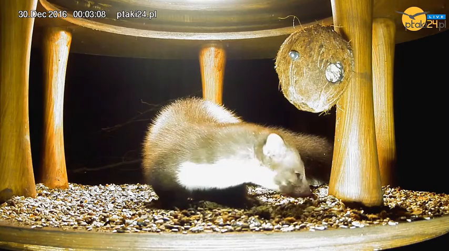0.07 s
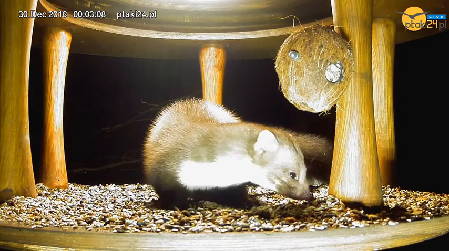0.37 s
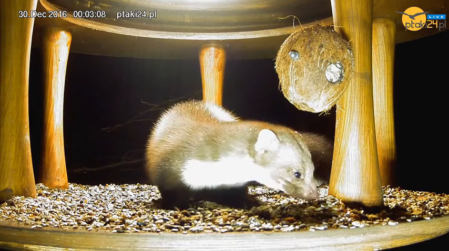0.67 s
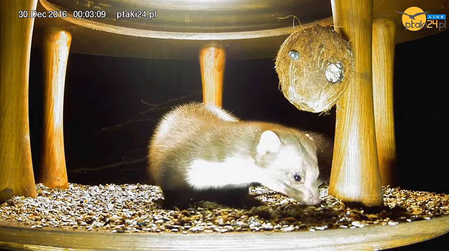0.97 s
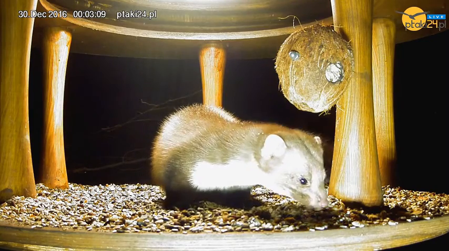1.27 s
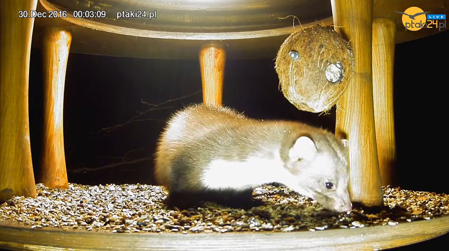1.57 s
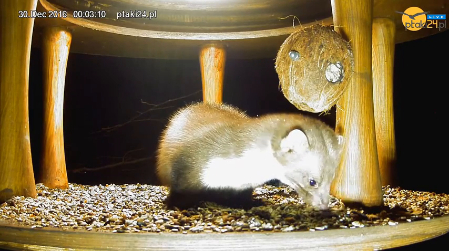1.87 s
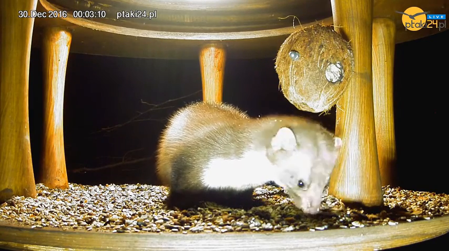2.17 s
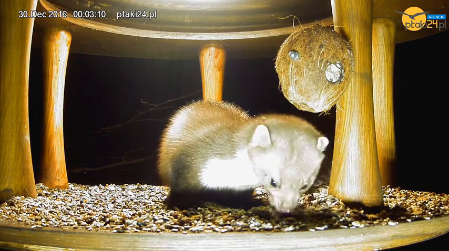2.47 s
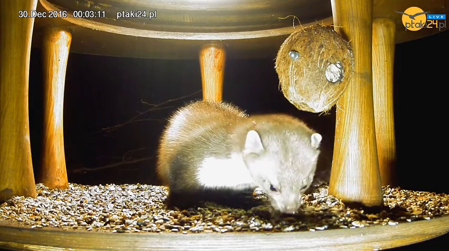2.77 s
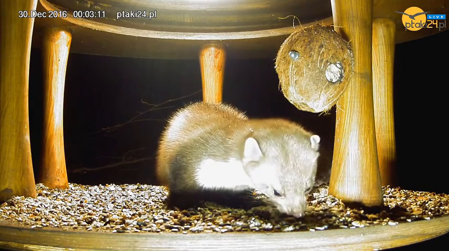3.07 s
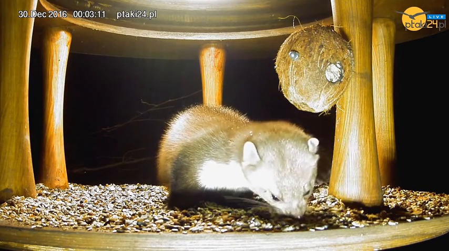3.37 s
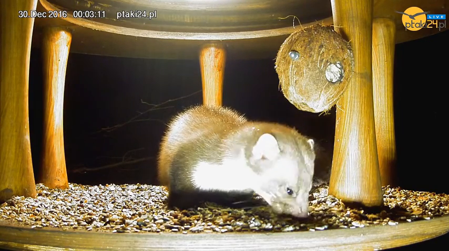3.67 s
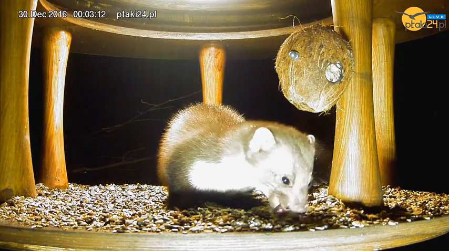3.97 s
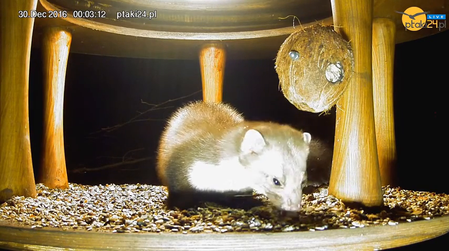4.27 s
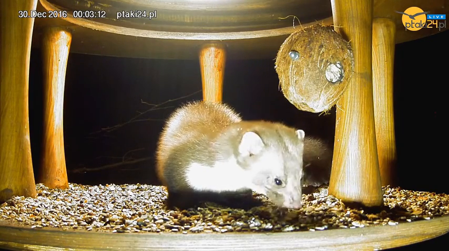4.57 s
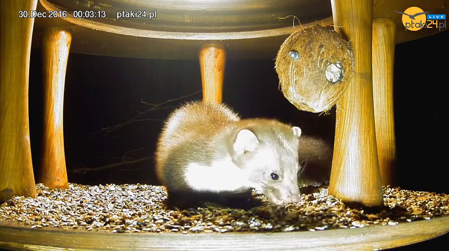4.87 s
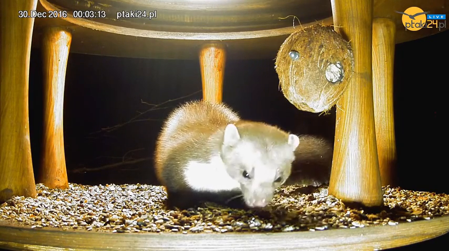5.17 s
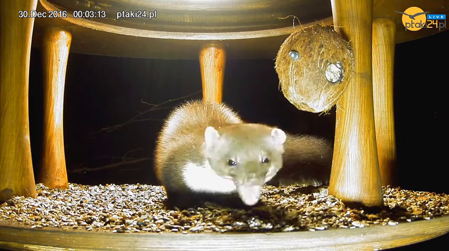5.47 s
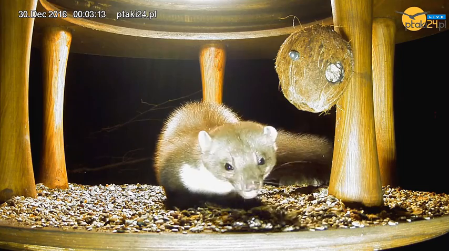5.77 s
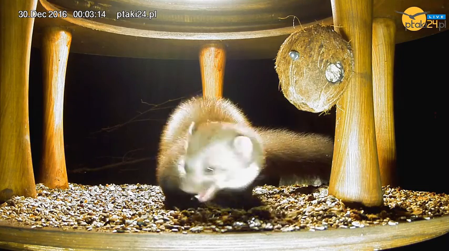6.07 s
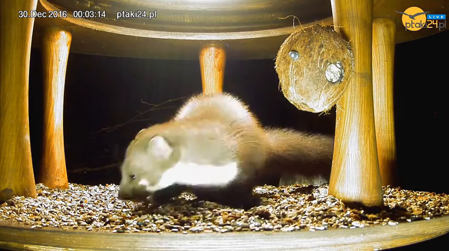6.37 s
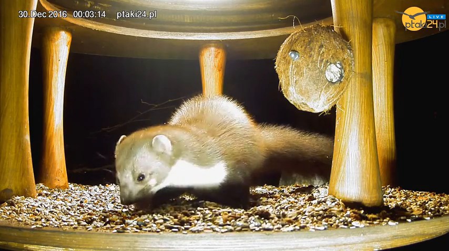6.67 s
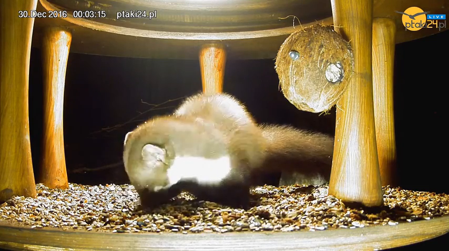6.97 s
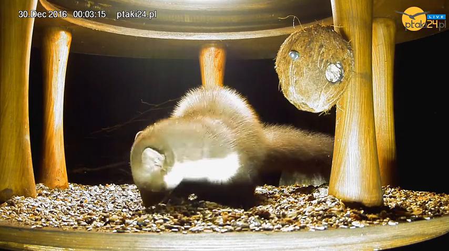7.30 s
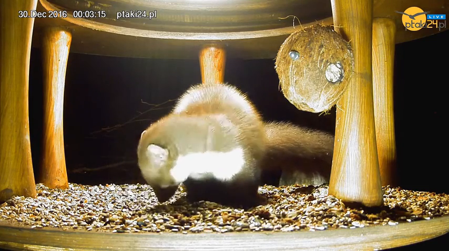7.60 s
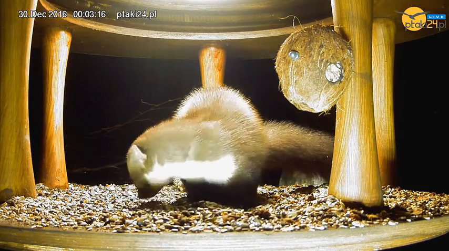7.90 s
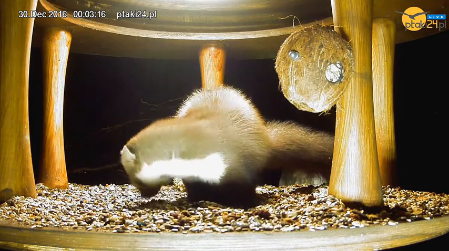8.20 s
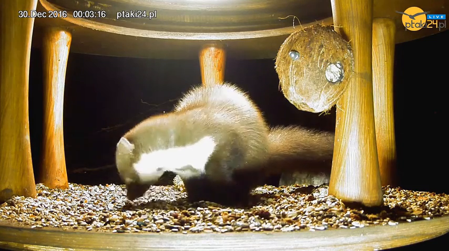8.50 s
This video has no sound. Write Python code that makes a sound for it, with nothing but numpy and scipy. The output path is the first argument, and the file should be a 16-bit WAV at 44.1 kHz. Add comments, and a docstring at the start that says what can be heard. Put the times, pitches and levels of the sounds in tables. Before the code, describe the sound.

Steady electrical hum and hiss, with quiet, scattered ticks and snaps of a marten chewing seeds, then two soft taps.

```python
"""Mains hum and hiss from a webcam microphone, at telephone bandwidth. Under them, at night, a marten
shifts loose seeds in a roofed wooden bird feeder. From about 3 s it eats: muzzle and paws stir the
seeds, husks tick, snap and splinter between its teeth. Twice something taps the tray softly.
Tray, posts and roof add short reflections."""
import sys
import numpy as np
from scipy import signal
from scipy.fft import rfft, irfft, next_fast_len
from scipy.io import wavfile

SR = 44100
rng = np.random.default_rng(int(sys.argv[2]) if len(sys.argv) > 2 else 0)


def store_pcm(level_fs):
    """Save levels as 16-bit WAV."""
    pcm = np.round(np.clip(level_fs, -1, 1) * 32767).astype(np.int16)
    wavfile.write(sys.argv[1], SR, np.atleast_2d(pcm).T)


N = 381024
FRAGMENT_BODY_DB = -5  # body share of ticks and splinters


def amp(db):
    """Decibels to gain."""
    return 10 ** (np.asarray(db) / 20)


def unit(x):
    """Scale to rms 1."""
    return x / np.sqrt(np.mean(x ** 2) + 1e-20)


def filtered(x, response):
    """Apply the gain response(hz) to the spectrum of x."""
    size = next_fast_len(N + SR // 2)
    return irfft(rfft(x, size) * response(np.fft.rfftfreq(size, 1 / SR)), size)[:N]


def coloured(x, points):
    """Shape x by (Hz, dB) points on a log axis."""
    points_hz, db = np.transpose(points)
    return filtered(x, lambda hz: amp(np.interp(np.log(hz + 1), np.log(points_hz + 1), db)))


def add(track, start_s, sound):
    """Mix a short sound into track."""
    part = track[round(start_s * SR):][:len(sound)]
    part += sound[:len(part)]


def ring(t, hz, t60_s):
    """One damped mode."""
    return np.sin(2 * np.pi * hz * t) * amp(-60 * t / t60_s)


def grains(per_s, spread_db=1.0):
    """Random impulses of uneven size, rms 1."""
    impulses = (rng.random(N) < per_s / SR) * rng.choice([-1, 1], N)
    return unit(impulses * amp(spread_db * rng.standard_normal(N)))


def electronics(mains_hz=50.1, whine_hz=885.9, whine_db=-77.5):
    """Steady hiss, rectified mains hum (even multiples strongest) and one thin whine."""
    # Microphone noise. Each row: frequency in Hz, density in dB per Hz.
    hiss_spectrum = [(5, -90), (14, -77.5), (35, -78), (60, -82), (120, -84), (250, -88), (500, -89.5),
                     (700, -90.5), (950, -94.5), (1300, -95.5), (1700, -96.5), (2600, -96), (3200, -97),
                     (3900, -105)]
    # Hum partials. Each row: multiple of the mains, rms level in dB.
    harmonics = [(1, -65.5), (2, -49.5), (3, -77), (4, -65.5), (5, -79), (6, -64.5), (7, -85.5), (8, -68.5),
                 (10, -73.5), (12, -76.5), (14, -87), (16, -70.5), (18, -76), (20, -79.5), (22, -78),
                 (24, -82), (26, -82), (28, -86.5), (30, -85.5), (42, -87), (44, -90), (52, -86.5)]
    t = np.arange(N) / SR

    def tone(hz, rms_db):
        return np.sqrt(2) * amp(rms_db) * np.sin(2 * np.pi * (hz * t + rng.random()))

    hiss = coloured(rng.standard_normal(N), hiss_spectrum) * np.sqrt(SR / 2)
    hum = sum(tone(multiple * mains_hz, db) for multiple, db in harmonics)
    return hiss + hum + tone(whine_hz, whine_db)


def seed_rustle(idle_db=-79):
    """Seeds rub in short swells of dense grains; in between, single ones shift under the paws."""
    # Seeds pushed about or ground. Each row: centre in seconds, half length in seconds, level in dB.
    stirs = [(3.105, 0.18, -63.5), (3.71, 0.015, -61.5), (3.945, 0.041, -69), (4.14, .03, -65.5),
             (5.162, 0.033, -74), (5.82, 0.019, -65), (6.12, 0.037, -65), (6.406, 0.015, -64.5),
             (8.568, 0.054, -67.5)]
    # Colour of loose seeds. Each row: frequency in Hz, relative level in dB.
    seed_spectrum = [(300, -26), (900, -3.5), (1350, 7), (1800, -7), (2400, 0), (3100, 1.5), (3800, -2),
                     (4600, -40)]
    t = np.arange(N) / SR
    swells = sum(amp(db) * np.exp(-((t - centre_s) / half_s) ** 2) for centre_s, half_s, db in stirs)
    stirred = unit(coloured(grains(per_s=3300), seed_spectrum))
    settling = unit(coloured(grains(per_s=33), seed_spectrum))
    return swells * stirred + amp(idle_db) * settling


def fracture(husk_hz, body_db, husk_t60_s=0.004, halving_db=11.5, scatter_db=5.5):
    """A breaking husk rings and shakes shared body modes; the more it passes on, the shorter it rings."""
    # Body modes of every snap. Each row: frequency in Hz, relative level in dB, t60 in seconds.
    modes = [(700, -12.5, 0.0083), (1395, -13, 0.02), (2410, -18.5, 0.016), (3100, -17.5, 0.015)]
    t = np.arange(SR // 20) / SR
    body = sum(amp(db + scatter_db * rng.standard_normal()) * ring(t, hz, t60_s)
               for hz, db, t60_s in modes)
    husk = ring(t, husk_hz, husk_t60_s * 2 ** (-body_db / halving_db))
    return husk + amp(body_db) * body


def chewing(gap_s=0.41, tick_db=-53, tick_hz=3050, scatter_db=3.0, pitch_scatter=0.08):
    """Bits of husk tick faintly between the teeth, a few times a second."""
    # Spells of chewing. Each row: start in seconds, end in seconds.
    spells = [(2.9, 6.15), (8.05, 8.6)]
    out = np.zeros(N)
    for start_s, end_s in spells:
        for beat_s in np.arange(start_s, end_s, gap_s):
            size, pitch = rng.standard_normal(2)
            tick = fracture(tick_hz * np.exp(pitch_scatter * pitch), FRAGMENT_BODY_DB)
            late_s = 0.5 * gap_s * rng.random()
            add(out, beat_s + late_s, amp(tick_db + scatter_db * size) * tick)
    return out


def bites(gap_s=0.0037, splinter_db=-11.5, rise_db=0.5, scatter_db=1.0, pitch_scatter=0.087):
    """Husks crack; some then crumble in a quick, uneven run of weaker splinters."""
    # Cracking husks. Each row: start in seconds, level in dB, husk pitch in Hz, body share in dB,
    # crumbling time in seconds.
    cracks = [(3.289, -44.5, 3000, -3, 0.0018), (3.698, -35.5, 2400, 7, 0.03), (3.7138, -42, 2100, 2.5, 0),
              (3.779, -48.5, 3230, 1.5, 0.026), (3.9117, -34, 2810, 0, 0), (3.9569, -45, 2330, -8, 0.0077),
              (4.3854, -41, 2950, -11, 0), (4.505, -45.5, 1950, -17, 0.0032),
              (4.9087, -40, 2300, 1, 0.0018), (5.0132, -44.5, 2300, -7, 0), (5.152, -38, 2170, -2.5, 0.005),
              (5.2166, -34, 2610, -2, 0.005), (5.221, -33, 2380, -5, 0),
              (5.4514, -35.5, 3040, -12.5, 0.004), (5.4623, -47, 3000, -8, 0),
              (5.798, -35.5, 2990, 3, 0.02), (6.406, -40, 2700, 5, 0.012), (6.431, -44.5, 2390, -5, 0),
              (8.209, -48, 2670, -4, 0), (8.5518, -49.5, 2600, 3, 0)]
    out = np.zeros(N)
    for start_s, crack_db, husk_hz, body_db, crumble_s in cracks:
        add(out, start_s, amp(crack_db) * fracture(husk_hz, body_db))
        for k in range(8):  # at most 8 splinters
            late_s = gap_s * (k + 0.5 + rng.random())
            size, pitch = rng.standard_normal(2)
            splinter = fracture(husk_hz * np.exp(pitch_scatter * pitch), FRAGMENT_BODY_DB)
            if late_s < crumble_s:
                level_db = crack_db + splinter_db + rise_db * late_s / crumble_s + scatter_db * size
                add(out, start_s + late_s, amp(level_db) * splinter)
    return out


def husks(gain_db=2.5, low_cut_hz=950):
    """Bites and chewing together, with the bass below about 1 kHz kept low."""
    low_cut = signal.butter(2, low_cut_hz, "highpass", fs=SR, output="sos")
    return amp(gain_db) * signal.sosfilt(low_cut, bites() + chewing())


def tray_taps(contact_s=0.0015):
    """A soft contact builds up over a cycle or so and leaves one dull note."""
    # Taps on the tray. Each row: start in seconds, level in dB, pitch in Hz, t60 in seconds.
    taps = [(7.451, -38.5, 1210, 0.013), (7.7045, -29, 1066, 0.0084)]
    out, t = np.zeros(N), np.arange(SR // 20) / SR
    attack = 1 - np.exp(-t / contact_s)
    for start_s, db, hz, t60_s in taps:
        add(out, start_s, amp(db) * ring(t, hz, t60_s) * attack)
    return out


def feeder_reflections(x, wet_db=-11, t60_s=0.07, delay_s=0.0013):
    """Tray, posts and roof add short, dense reflections, redrawn every 0.2 s as the head moves."""
    t = np.arange(SR // 8) / SR
    wet, block = np.zeros(N), SR // 5
    for start in range(0, N, block):
        tail = rng.standard_normal(len(t)) * amp(-60 * t / t60_s) * (t > delay_s)
        tail /= np.linalg.norm(tail)
        add(wet, start / SR, signal.fftconvolve(x[start:start + block], tail))
    return x + amp(wet_db) * wet


def scene():
    """The animal in the feeder, over the microphone's own noise."""
    direct = husks() + tray_taps() + seed_rustle()
    return (feeder_reflections(direct) + electronics())[None]


def record(dry, link_rates_hz=(8000, 11025), top_hz=15700, dc_offset=0.029):
    """Telephone-rate sampling, stepped up linearly, mirrors faint copies of the sound into the treble."""
    output_t = np.arange(N) / SR
    t, x = output_t, filtered(dry[0], lambda hz: hz < link_rates_hz[0] / 2)
    for rate_hz in link_rates_hz:
        link_t = np.arange(0, N / SR, 1 / rate_hz)
        t, x = link_t, np.interp(link_t, t, x)
    upsampled = np.interp(output_t, t, x)
    return dc_offset + filtered(upsampled, lambda hz: hz < top_hz)[None]


dry = scene()
out = record(dry)
store_pcm(out)
```